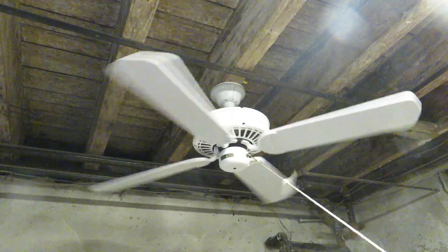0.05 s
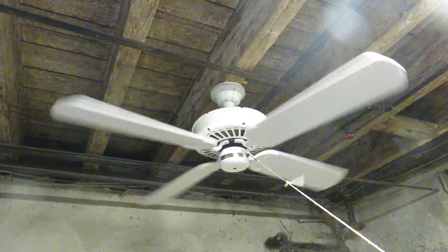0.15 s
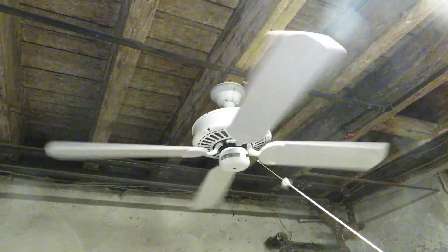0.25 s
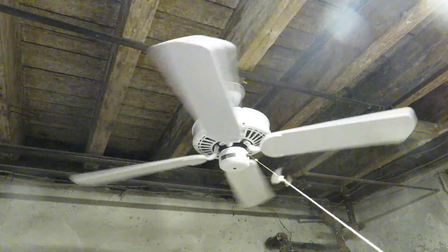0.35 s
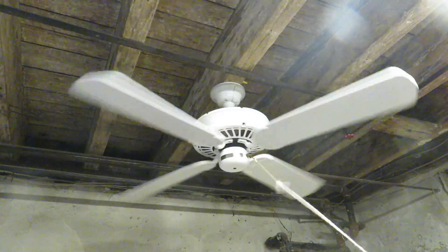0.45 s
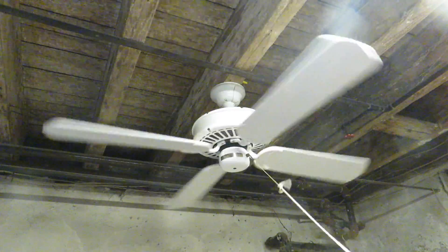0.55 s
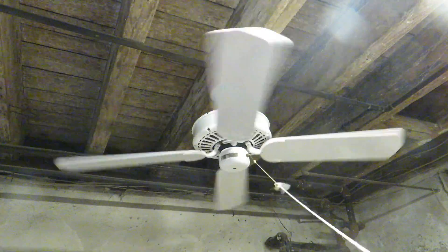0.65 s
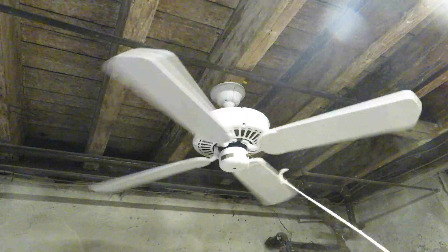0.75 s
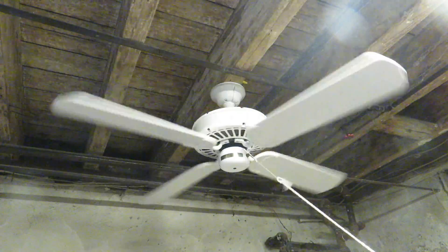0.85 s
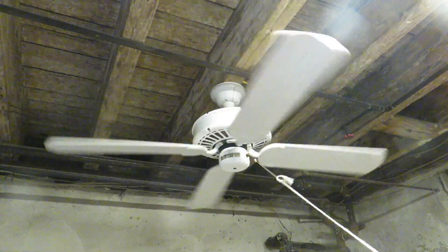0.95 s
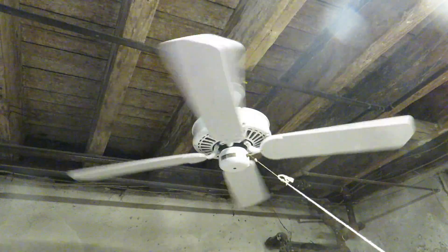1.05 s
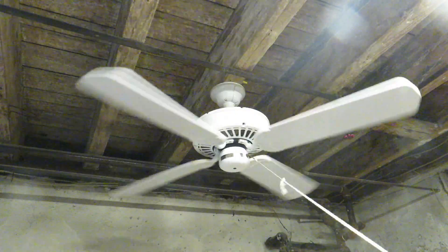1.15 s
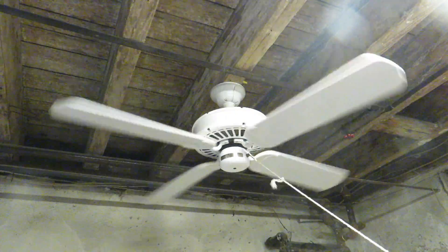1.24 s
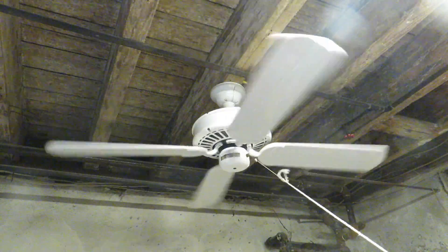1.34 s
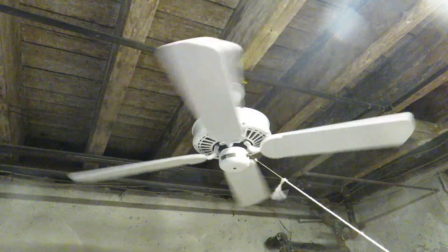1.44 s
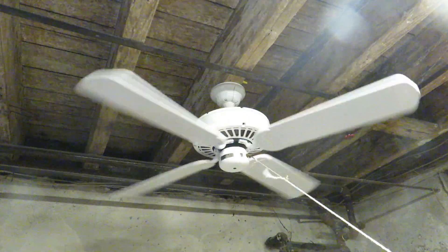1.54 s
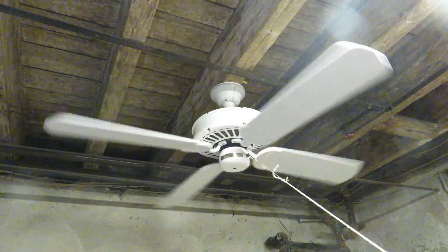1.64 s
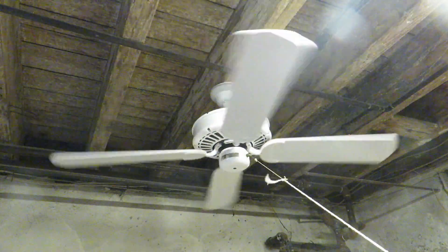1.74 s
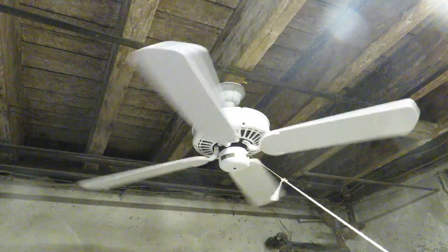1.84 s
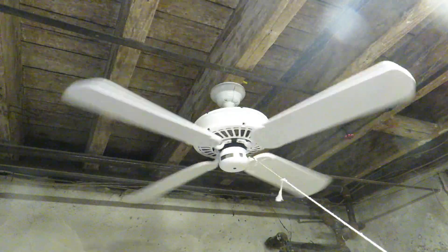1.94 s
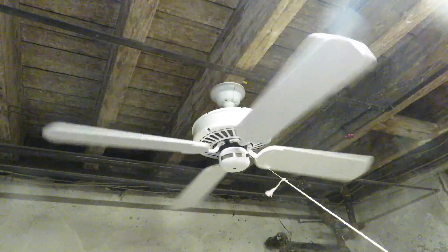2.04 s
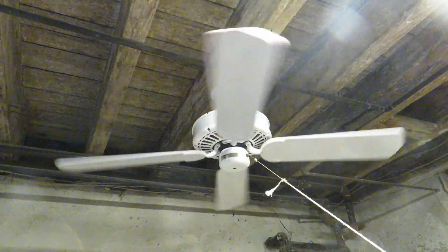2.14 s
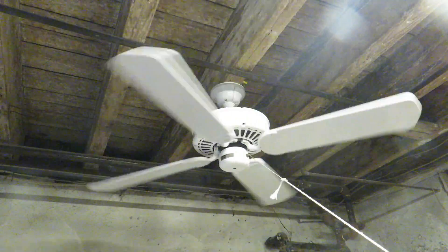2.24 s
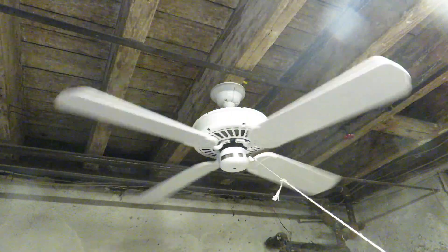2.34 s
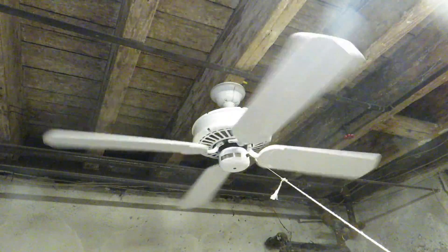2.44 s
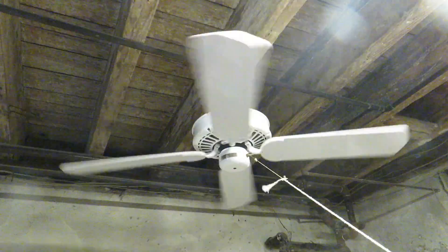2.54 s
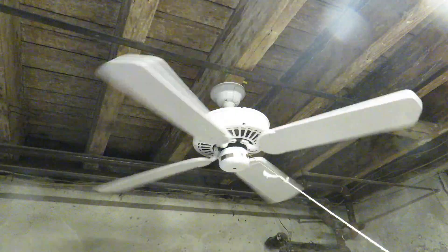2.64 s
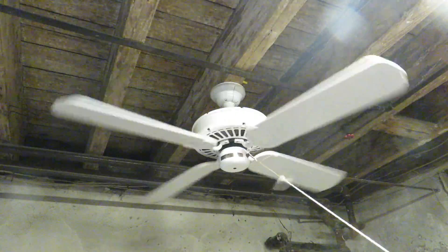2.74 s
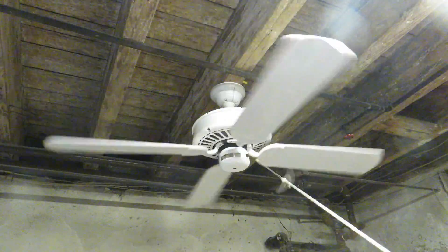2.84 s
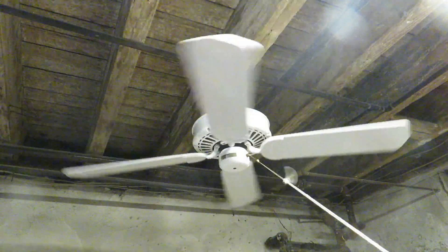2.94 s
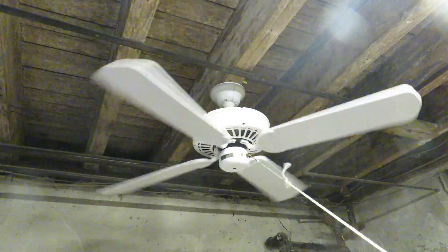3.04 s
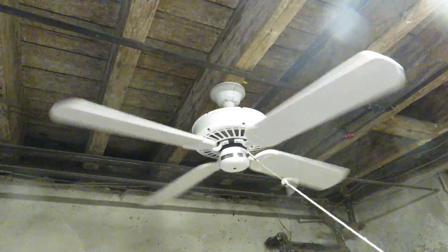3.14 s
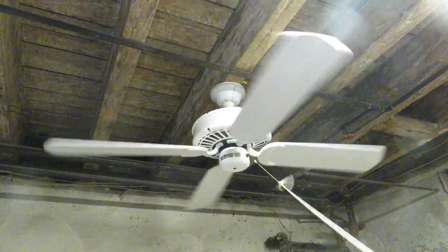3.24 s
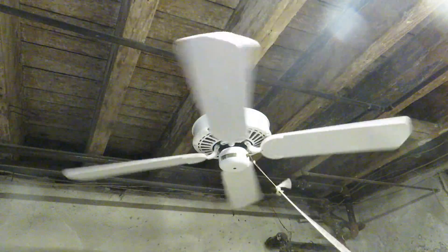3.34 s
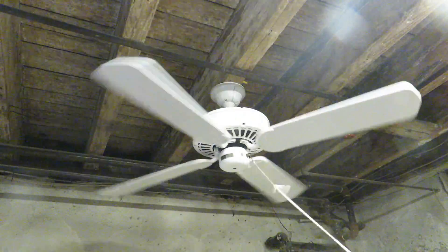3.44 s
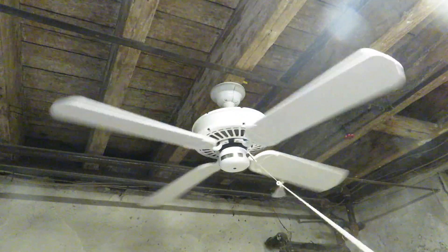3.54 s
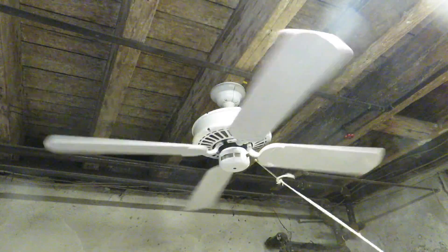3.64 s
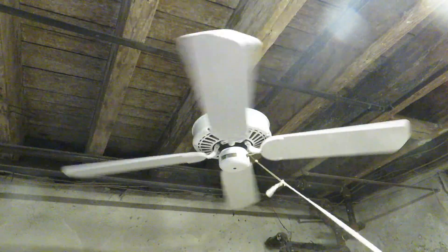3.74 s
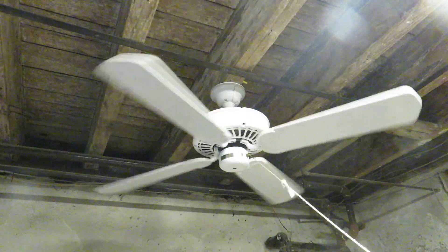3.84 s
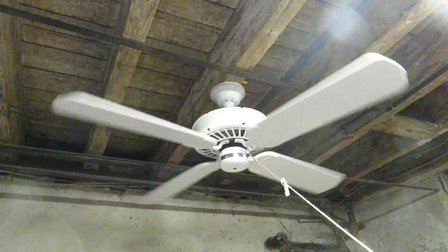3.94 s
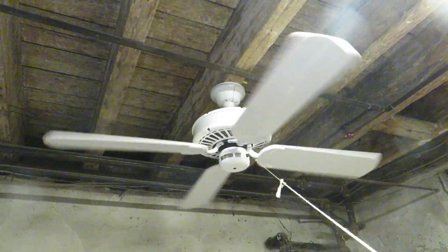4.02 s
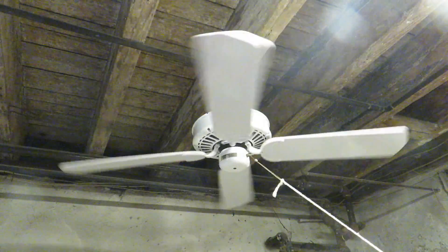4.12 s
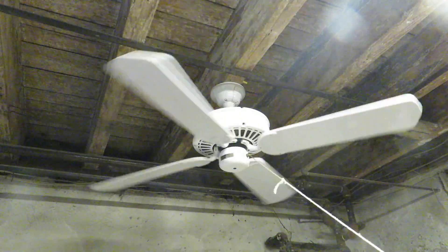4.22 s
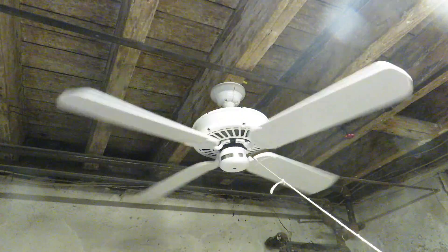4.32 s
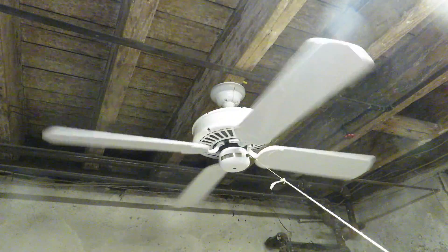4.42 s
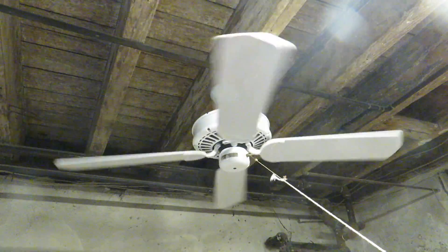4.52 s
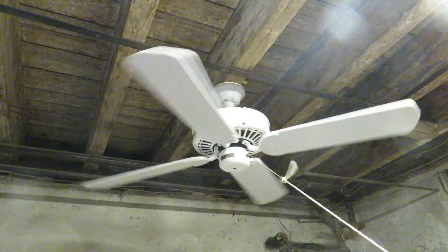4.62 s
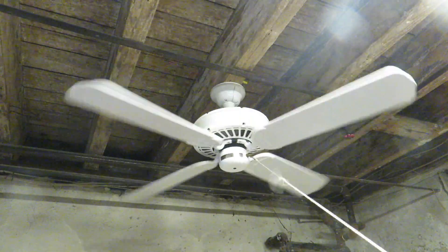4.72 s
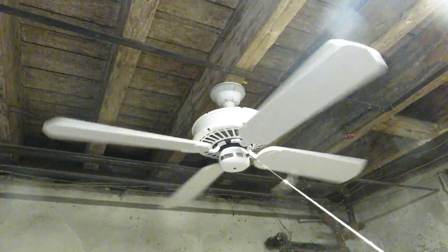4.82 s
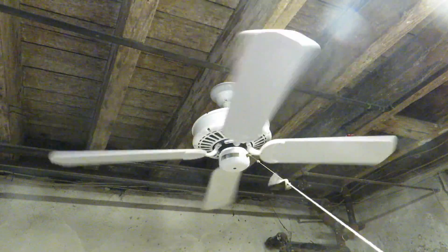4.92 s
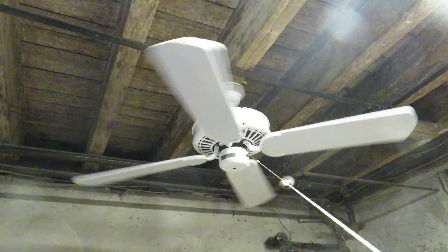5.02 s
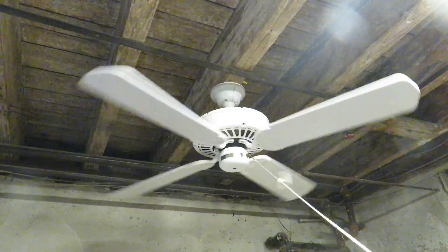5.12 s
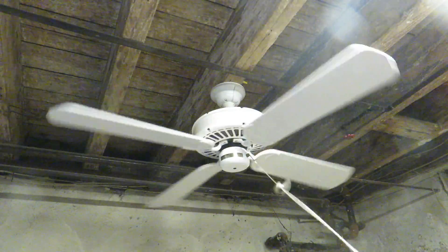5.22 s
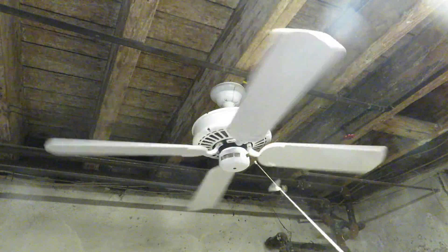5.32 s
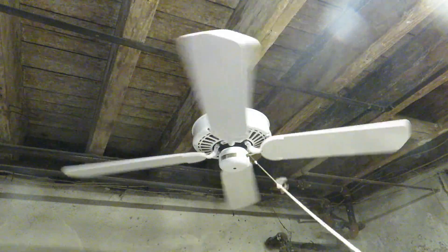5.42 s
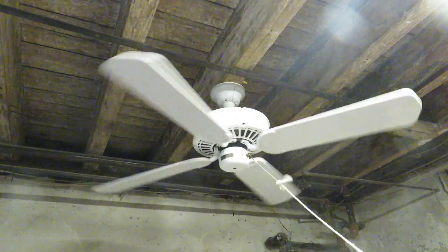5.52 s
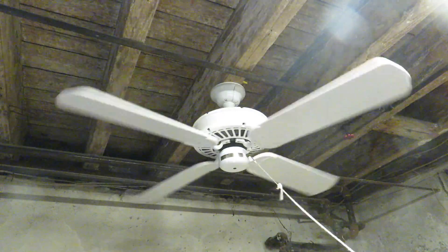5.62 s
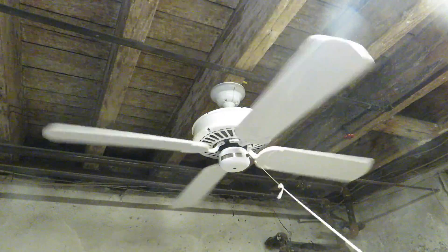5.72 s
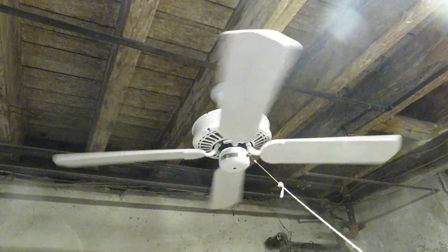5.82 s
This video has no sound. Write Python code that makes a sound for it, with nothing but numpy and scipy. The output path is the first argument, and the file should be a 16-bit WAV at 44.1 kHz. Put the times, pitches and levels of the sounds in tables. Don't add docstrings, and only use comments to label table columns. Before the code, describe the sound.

In a quiet wooden-ceilinged room, someone pulls a fan cord three times. Every pull snaps a ratchet hard, jolting housing and blades into a short low metallic ring, then the spring draws the chain back with three rapid clicks. Long pauses hold only microphone hiss, low rumble and barely audible bead ticks. The later snaps are louder; no motor hum is heard.

```python
import sys
import numpy as np
from scipy import signal
from scipy.fft import rfft, irfft
from scipy.io import wavfile

SR = 44100
rng = np.random.default_rng(int(sys.argv[2]) if len(sys.argv) > 2 else 0)


def rack_gain(trim_db):
    fader = np.asarray(trim_db, float)
    return 10 ** (fader / 20)


def to_wav(sig):
    pcm = np.clip(np.atleast_2d(sig), -1, 1) * 32767
    pcm = np.round(pcm).astype(np.int16)
    wavfile.write(sys.argv[1], SR, pcm.T)


N = 258867


def at(table, hz):
    f, v = np.transpose(table)
    return np.interp(np.log(np.maximum(hz, 1)), np.log(f), v)


def colour(x, table):
    gain = rack_gain(at(table, np.fft.rfftfreq(len(x), 1 / SR)))
    y = irfft(rfft(x) * gain, len(x))
    return y / np.sqrt(np.mean(y ** 2))


def add(out, x, s):
    i = int(s * SR)
    x = x[max(-i, 0):N - i]
    start = max(i, 0)
    out[start:start + len(x)] += x


# [Hz, dB per Hz]
HISS_MID = [(10, -4.5), (25, -10), (40, -7.5), (58, 0.5), (92, -7), (280, -9.5), (410, -11.5), (840, -15),
            (1000, -15), (3150, -20.5), (6800, -27.5), (14300, -41.5), (15300, -36), (16200, -54)]
HISS_SIDE = [(8.8, -57), (15, -27), (38, -32), (135, -5.5), (421, 0.5), (532, -5), (1140, -7.5), (1240, -8),
             (1980, -10), (4500, -16.5), (12900, -33), (14500, -37), (16300, -43)]


def hiss():
    mid = rack_gain(-53.5) * colour(rng.standard_normal(N), HISS_MID)
    side = rack_gain(-54) * colour(rng.standard_normal(N), HISS_SIDE)
    return mid, side


# [Hz, s]
ROOM_T60 = [(150, 1), (600, 0.66), (2400, 0.21), (6000, 0.19), (14000, 0.098)]
# [Hz, dB]
ROOM_MID = [(150, -36), (1200, -41.5), (2400, -30.5), (6000, -28), (14000, -34.5)]
ROOM_SIDE = [(150, -59), (600, -66), (2400, -52), (6000, -36), (14000, -25.5)]


def echo(share, gap_s):
    t = np.arange(SR // 2) / SR
    tail = 0
    for hz in 125 * 2. ** np.arange(8):
        edges_hz = [hz / np.sqrt(2), min(hz * np.sqrt(2), 20000)]
        octave = signal.butter(2, edges_hz, "band", fs=SR, output="sos")
        fade = rack_gain(at(share, hz) - 60 * t / at(ROOM_T60, hz)) * (1 - np.exp(-t / gap_s))
        tail = tail + signal.sosfilt(octave, rng.standard_normal(len(t))) * fade
    return tail


def ring(modes, rise_s, pitch_hz=1, flutter_s=0.00423, flutter_db=7.5):
    t = np.arange(SR // 2) / SR
    hz, db, t60 = np.transpose(modes)[:, :, None]
    luck = rng.standard_normal((2, len(modes), 1))
    tones = np.sin(2 * np.pi * pitch_hz * hz * (1 + 0.0021 * luck[0]) * t + luck[1])
    steps = rng.standard_normal((len(modes), 200))
    flutter = np.array([np.interp(t / flutter_s, np.arange(200), row) for row in steps])
    level = rack_gain(db + flutter_db * flutter - 60 * t / t60)
    return (tones * level).sum(axis=0) * (1 - np.exp(-t / rise_s)) ** 2


# [Hz, dB per Hz]
THUD = [(80, -18), (200, -2), (600, -1), (900, -0.5), (1600, -11), (3000, -21)]


def thud(rise_s, t60_s):
    t = np.arange(SR // 2) / SR
    knock = colour(rng.standard_normal(len(t)), THUD)
    return knock * rack_gain(-60 * t / t60_s) * (1 - np.exp(-t / rise_s))


# [Hz, dB, s]
MOUNT = [(81.7, -7, 0.86), (100.8, -5, 0.88), (137, -2.5, 0.23), (171, -2.5, 0.59)]
BLADES = [(222, -14, .45), (265, -8, .28), (288, -7, .2), (305, 2, .26)]
IRONS = [(343, 0, .28)]
NECK = [(480, -6, .16), (570, -7, .15), (620, -7, .2), (657, 0, .27), (682, -1, .22)]
HOUSING = [(762, -6, .24), (790, 0, .21), (815, 1, .23), (853, -4, .22), (950, -16, .2), (1020, -16, .15),
           (1150, -19, .12), (1240, -20, .12)]


def jolt(mount_db, neck_db, blades_db, irons_db):
    mount = rack_gain(mount_db - 1.5) * ring(MOUNT, rise_s=0.011, flutter_s=0.0268)
    blades = rack_gain(blades_db + 1) * ring(BLADES, rise_s=0.0034, flutter_s=0.0227, flutter_db=3)
    irons = rack_gain(irons_db + 2) * ring(IRONS, rise_s=0.022, flutter_s=0.037, flutter_db=3.1)
    neck = rack_gain(neck_db - 2.5) * ring(NECK, rise_s=0.0013, flutter_s=0.015)
    knock = rack_gain(-9.5) * thud(rise_s=0.0045, t60_s=0.33)
    housing = ring(HOUSING, rise_s=0.0035, flutter_s=0.0129, flutter_db=3.5)
    return mount + blades + irons + neck + knock + housing


# [s, dB, dB, dB, dB]
TAKE_UPS = [
    (-0.012, -41, -42.5, -5, -2),
    (2.844, -40.5, -39, -10, -6),
    (4.7948, -39.5, -36, -6.5, -19),
]
SNAPS = [
    (0.0685, -28.5, -34.5, -12, 5),
    (2.9174, -24, -35, 6, -4),
    (4.8565, -22, -28, 2, -3),
]
STOPS = [
    (.080, -26.5, -28.5, -0.5, -7),
    (2.931, -30.5, -30, -7, -1),
    (4.872, -31, -29, -4, 3.5),
]
REWINDS = [
    (0.3594, -37, -48, -7.5, 5),
    (0.401, -34, -39, -9, -17),
    (3.191, -38, -46, 2, 0),
    (3.2251, -32.5, -41, -21, -17),
    (5.1098, -38, -48, -1, 2),
    (5.1463, -31, -40, -27, -19),
]
SEATS = [
    (0.4251, -27.5, -38, -6, -6),
    (3.2452, -27, -32, -9.5, 1.1),
    (5.166, -30, -32.5, -8.5, -21),
]
STROKES = [TAKE_UPS, SNAPS, STOPS, REWINDS, SEATS]
# [s, dB, dB]
SHAKES = [
    (.002, -14, -8.5),
    (.0015, -29.5, -11),
    (-.002, -12.5, -7.5),
    (-0.0042, -12.5, -16),
    (.001, -22, -5),
]


def fan():
    out = np.zeros(N)
    for strokes, (lag_s, mount_db, neck_db) in zip(STROKES, SHAKES):
        for s, _, jolt_db, blades_db, irons_db in strokes:
            add(out, rack_gain(jolt_db) * jolt(mount_db, neck_db, blades_db, irons_db), s + lag_s)
    return out


# [Hz, dB per Hz]
SNAP_COLOUR = [(600, -25.5), (1500, -22), (2400, -9), (3300, -4.5), (4500, -10), (5300, -5.5), (6600, -7.5),
               (9000, -15.5), (10500, -15), (13000, -13.5), (15500, -23), (16500, -50)]


def snap(crack_s, rattle_s, rattle_db, bright_db):
    t = np.arange(SR // 2) / SR
    bursts = rng.exponential(size=len(t) // 24 + 1).repeat(24)[:len(t)]
    chatter = rng.standard_normal(len(t)) * rack_gain(1.17 * bursts)
    shape = np.exp(-t / crack_s) + rack_gain(rattle_db) * np.exp(-t / rattle_s)
    spectrum = [(hz, db + bright_db * np.log2(hz / 7000)) for hz, db in SNAP_COLOUR]
    return colour(chatter, spectrum) * shape * (1 - np.exp(-t / .0004))


# [Hz, dB, s]
CUP = [(1340, -5, .1), (1650, -9, .04), (1868, -6, .15), (1930, -4, .05), (2010, -2, .05), (2140, -3, .06),
       (2300, -8, .04)]
# [ratio, dB, s]
CAP = [(.94, -35, 0.011), (1, -0.5, 0.016), (1, -7.5, 0.048), (1.025, -7, 0.05), (1.07, -1.5, 0.013),
       (1.14, -6.5, 0.016)]


def click(cup_db, cap_db, cap_hz, bright_db):
    crack = rack_gain(-3) * snap(crack_s=0.00094, rattle_s=0.013, rattle_db=-2.5, bright_db=bright_db)
    cup = rack_gain(cup_db - 5.0) * ring(CUP, rise_s=0.00098)
    cap = ring(CAP, rise_s=0.00036, pitch_hz=cap_hz, flutter_s=0.0034, flutter_db=4.0)
    return crack + cup + rack_gain(cap_db - 2.5) * cap


# [dB, dB, Hz, dB per octave]
STRIKES = [
    (-11, -4, 2900, -1),
    (-9.5, -8, 2880, 2.5),
    (-13, 1, 2900, 0.5),
    (-7, 1.5, 3480, 5.5),
    (-8.5, 7, 2870, -2.5),
]
# [s, dB, dB, Hz]
BOUNCES = [
    (.071, -27, 0, 3590),
    (0.4271, -27, 4, 3500),
    (2.8465, -46, 10.5, 2860),
    (3.247, -33, 10, 3545),
    (4.796, -43.5, 11, 3450),
    (4.8605, -22.5, -5, 3430),
    (5.168, -30.5, -4, 3400),
]
# [s, dB, s]
BEADS = [
    (1.703, -45.5, 0.04),
    (1.874, -46, 0.019),
    (4.132, -46, .015),
]


def switch():
    out = np.zeros(N)
    for strokes, strike in zip(STROKES, STRIKES):
        for s, click_db, *_ in strokes:
            add(out, rack_gain(click_db) * click(*strike), s)
    for s, click_db, cap_db, cap_hz in BOUNCES:
        bounce = click(cup_db=-8.5, cap_db=cap_db, cap_hz=cap_hz, bright_db=-4)
        add(out, rack_gain(click_db) * bounce, s)
    for s, db, rattle_s in BEADS:
        tick = snap(crack_s=.002, rattle_s=max(rattle_s, .005), rattle_db=-5, bright_db=-7)
        add(out, rack_gain(db - 8) * tick, s)
    return out


def scene():
    mid, side = hiss()
    body, clicks = fan(), switch()
    mid_tail = signal.fftconvolve(clicks, echo(ROOM_MID, gap_s=0.0019))[:N]
    side_tail = signal.fftconvolve(clicks + body, echo(ROOM_SIDE, gap_s=0.0012))[:N]
    mid = mid + clicks + body + mid_tail
    side = side + side_tail
    return np.array([mid + side, mid - side])


def roll_off(x):
    return signal.sosfilt(signal.butter(12, 16450, fs=SR, output="sos"), x)


def record(dry):
    low_pass = signal.ellip(8, .2, 70, 16200, fs=SR, output="sos")
    mix = signal.sosfilt(low_pass, dry)
    return roll_off(mix)


dry = scene()
out = record(dry)
to_wav(out)
```